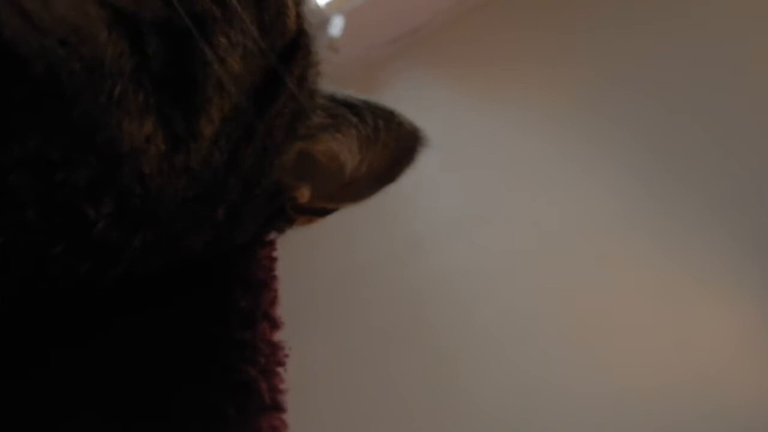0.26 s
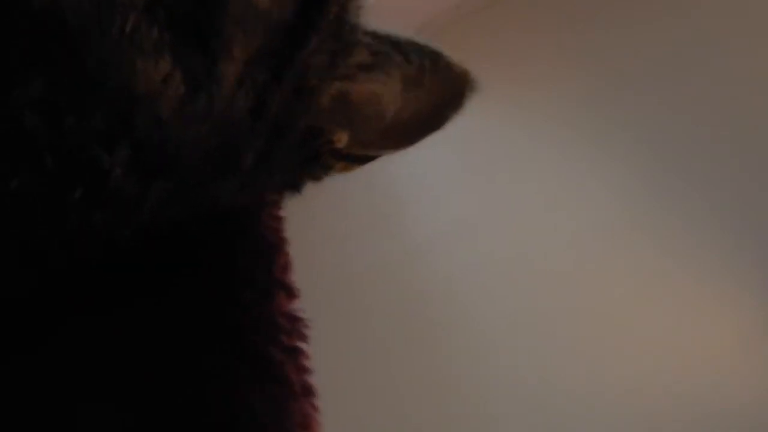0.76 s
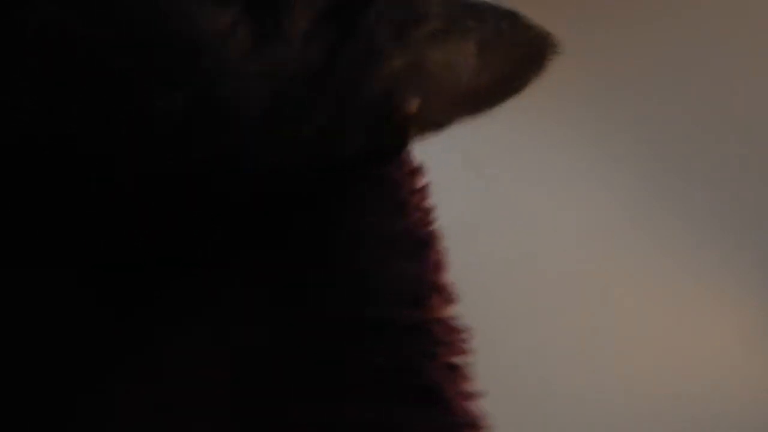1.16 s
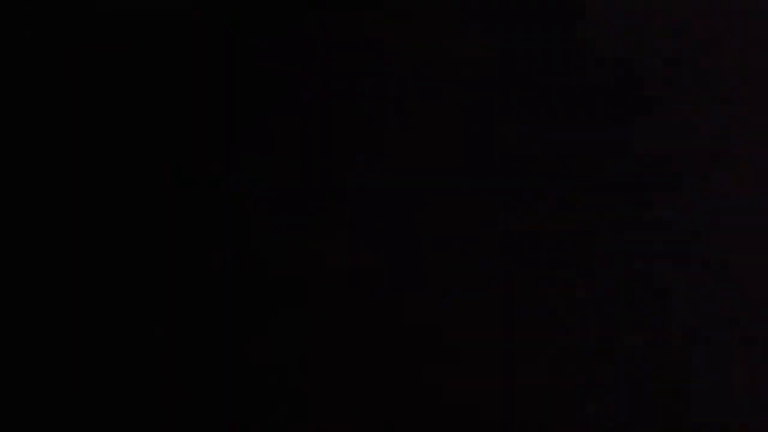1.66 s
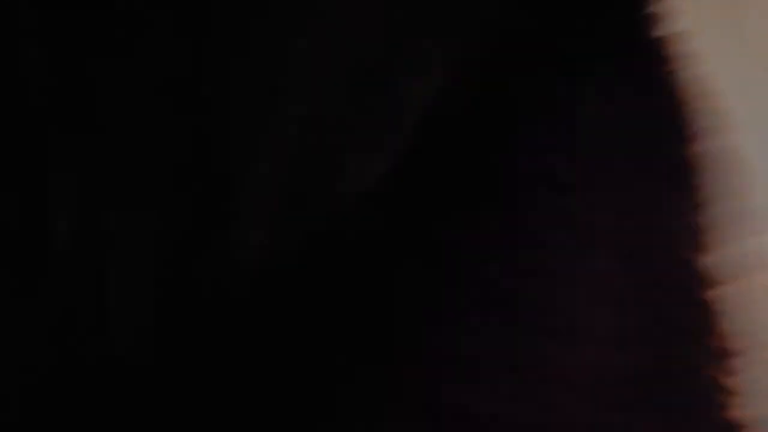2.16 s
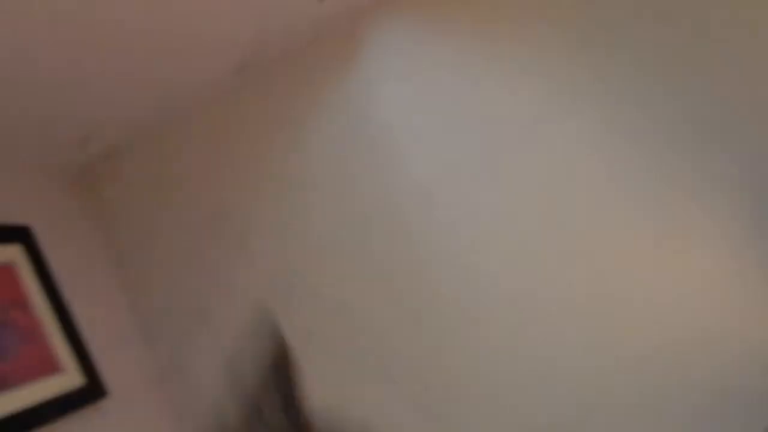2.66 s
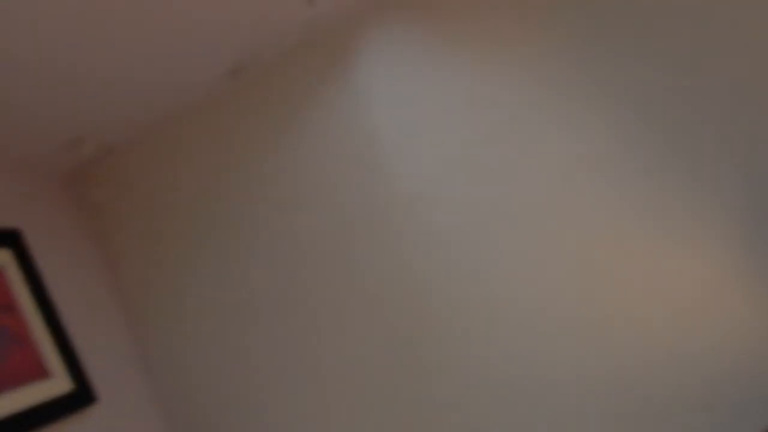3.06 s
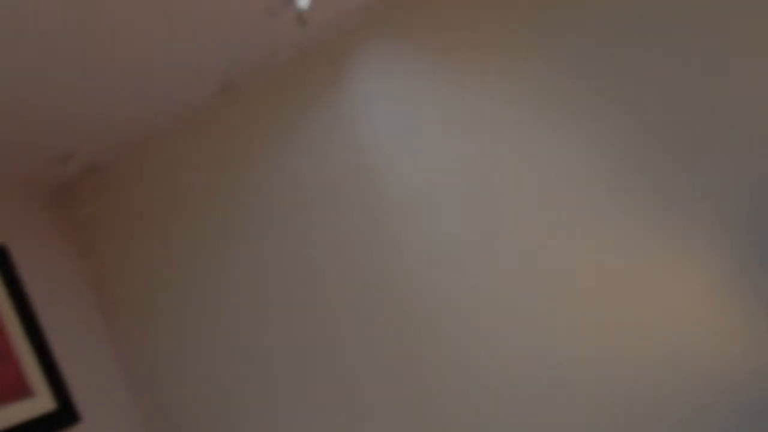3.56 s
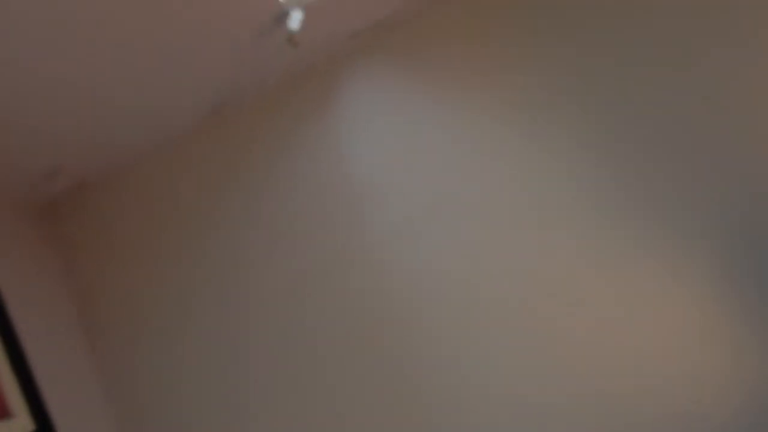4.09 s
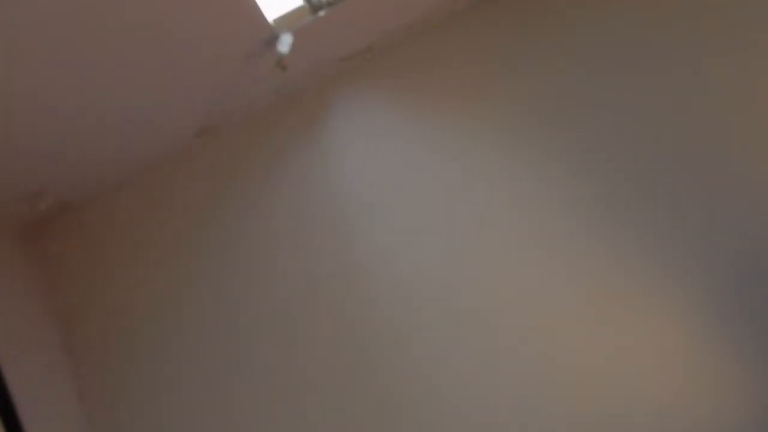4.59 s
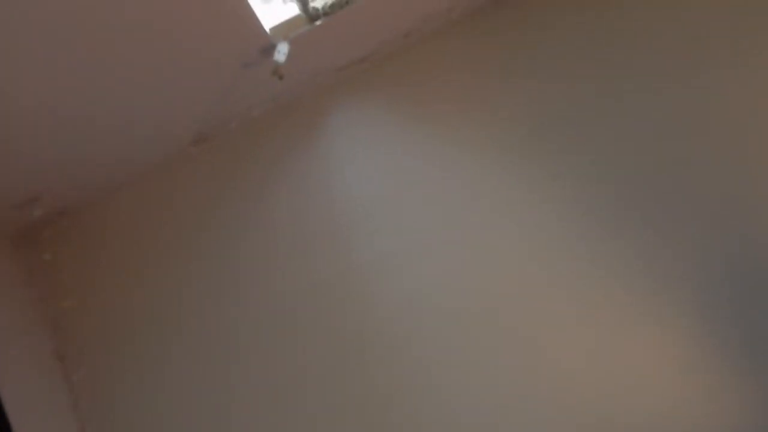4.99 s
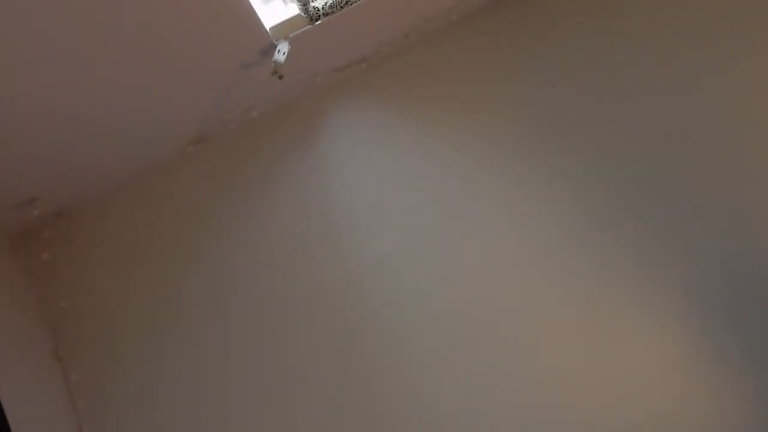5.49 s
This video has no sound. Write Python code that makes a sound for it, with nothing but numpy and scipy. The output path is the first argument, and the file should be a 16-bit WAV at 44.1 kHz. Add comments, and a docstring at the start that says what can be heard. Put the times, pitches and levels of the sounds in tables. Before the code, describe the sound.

Close stereo capture of an upset cat indoors over a very faint steady noise floor. A throaty, shut-mouth growl comes first, then thuds of a body moving on a soft blanket, teeth hiss, sharp spits and a loud breathy snarl. A quiet gap holds little ticks and sniffs. The cat, now further away with more room reflection, rasps, yowls piercingly downward and growls again.

```python
"""A long low growl comes first, from an angry cat right at the microphone in a small room with a faint noise floor.
Soft bumps, a hiss, spits, a hissing snarl and a mutter follow; further off, a rasp opens into a falling yowl,
which sinks back into a growl. Vocal pulses through mouth spectra make the growls, snarl and rasp; summed partials
make the yowl; shaped noise makes the breath, bumps and floor, with ringing sines in the spits.
A slower second vibration in the larynx pulls the pulses early and late, which makes the growls roll."""
import sys
import numpy as np
from scipy import signal
from scipy.fft import rfft, irfft, next_fast_len
from scipy.io import wavfile
from scipy.ndimage import uniform_filter1d

SR = 44100
rng = np.random.default_rng(int(sys.argv[2]) if len(sys.argv) > 2 else 0)


def dump(signal):
    """Clip the signal to [-1, 1] and save it as 16-bit WAV at the path in sys.argv[1]."""
    limited = np.clip(np.atleast_2d(signal).T, -1, 1)
    pcm = np.round(limited * 32767).astype(np.int16)
    wavfile.write(sys.argv[1], SR, pcm)


N = 253134
TIME = np.arange(N) / SR


def amp(db):
    """Decibels to gain."""
    return 10 ** (np.asarray(db) / 20)


def unit(x):
    """Scale to rms 1."""
    return x / np.sqrt(np.mean(x ** 2) + 1e-18)


def even(x):
    """Hold the slow level of a source at rms 1, averaged over 54 ms."""
    return x / np.sqrt(np.abs(uniform_filter1d(x ** 2, size=2400)) + 1e-12)


def curves(table):
    """The columns of a table after its time column, joined by straight lines in time."""
    s, *columns = np.transpose(table)
    return [np.interp(TIME, s, c) for c in columns]


def during(table):
    """Open while the table lasts, with 12 ms edges."""
    inside = np.minimum(TIME - table[0][0], table[-1][0] - TIME)
    return np.clip(inside / .012 + .5, 0, 1)


def note(start, stop, attack_s, release_s):
    """Envelope that rises, holds and falls."""
    return np.clip((TIME - start) / attack_s, 0, 1) * np.clip((stop - TIME) / release_s, 0, 1)


def around(s, width_s):
    """A smooth swell from 0 to 1 and back."""
    return np.exp(-((TIME - s) / width_s) ** 2)


def burst(s, t60, attack_s):
    """Envelope of a sudden sound that dies away by 60 dB in t60 seconds."""
    age = TIME - s
    return np.clip(age / attack_s + .5, 0, 1) * np.exp(-np.log(1000) * np.clip(age / t60, 0, 3))


def walk(rate_hz):
    """Smooth chance with a spread near 1: random points at the given rate, joined by lines."""
    return 1.2 * np.interp(TIME * rate_hz, np.arange(8192), rng.standard_normal(8192))


def colour(x, points):
    """Filter by a spectrum of (frequency [Hz], level [dB]) points, falling away below its lowest point."""
    hz, db = np.transpose(points)
    size = next_fast_len(N + 4096)
    freqs = np.fft.rfftfreq(size, 1 / SR)
    gain = amp(np.interp(np.log(freqs + 1), np.log(hz), db))
    gain = gain * np.minimum(freqs / hz[0], 1) ** 2
    return irfft(rfft(x, size) * gain, size)[..., :N]


def air(points, gate=1):
    """Stereo turbulence, chopped by the gate before it is coloured; the treble differs between the ports."""
    mid, side = rng.standard_normal((2, N))
    side = signal.sosfilt(signal.butter(3, 6200, "high", fs=SR, output="sos"), side)
    stereo = mid + side * np.array([[1.15], [-.4]])
    return unit(colour(stereo * gate, points))


def resonance(hz, width_hz):
    """Air ringing in one resonance whose centre may move."""
    phase = 2 * np.pi * np.cumsum(hz + 0 * TIME) / SR
    return walk(width_hz) * np.cos(phase) + walk(width_hz) * np.sin(phase)


def folds(hz, jitter, shimmer_db=2, pull=0, roll=0, swell=0, lead=0):
    """Vocal pulses, pulled in time and size by a slower vibration; also the puff of air after each."""
    cycles = np.cumsum(hz) / SR
    k = np.arange(1, int(cycles[-1]))
    at = np.interp(k, cycles, np.arange(N)).astype(int)
    chance = rng.standard_normal((len(k), 2)).T
    # roll is the rate of the slow vibration relative to the pulse rate; shift is in cycles
    slow = 2 * np.pi * np.cumsum(hz * roll)[at] / SR
    shift = pull * np.sin(slow) + jitter * chance[0]
    place = np.interp(k + shift, cycles, np.arange(N)).clip(0, N - 2)
    size = (1 + swell * np.cos(slow + lead)) * amp(shimmer_db * chance[1])
    # each pulse is shared between two samples, so it can fall between them
    i, part = place.astype(int), place % 1
    pulses = np.bincount(i, size * (1 - part), N) + np.bincount(i + 1, size * part, N)
    puff = signal.lfilter([1], [1, -np.exp(-1 / (.003 * SR))], pulses)  # 3 ms decay
    return pulses, even(puff)


def linger(x, hz, width_hz):
    """All-pass: a throat resonance holds back its band for a few ms, which softens each pulse."""
    r = np.exp(-np.pi * width_hz / SR)
    a = [1, -2 * r * np.cos(2 * np.pi * hz / SR), r ** 2]
    return signal.lfilter(a[::-1], a, x)


# spectrum of the faint noise floor: (frequency [Hz], level [dB])
FLOOR_SPECTRUM = [(60, -11), (250, -7), (1400, -20), (2100, -16), (3000, -23), (15000, -44.5)]


def noise_floor():
    """Steady coloured noise under everything, drifting slightly in level."""
    floor_db = -60
    return air(FLOOR_SPECTRUM) * amp(floor_db + 2 * walk(10))


def room(x, wet_db, t60):
    """A short tail from the bedroom walls, nearly the same at both ports."""
    age = TIME[:SR // 3]
    noise = rng.standard_normal(len(age)) + 0.36 * rng.standard_normal((2, len(age)))
    tail = noise * amp(-60 * age / t60)
    tail /= np.sqrt(np.sum(tail ** 2, axis=1, keepdims=True))
    return x + amp(wet_db) * signal.fftconvolve(x, tail, axes=1)[:, :N]


# soft bumps: (time [s], thud level [dB], tick relative to thud [dB], thud decay t60 [s])
SOFT_BUMPS = [(1.331, -20.5, -20, 0.089), (1.51, -37, -21, 0.082), (1.628, -32, -14, 0.11),
              (1.726, -26.5, -28, 0.089), (3.171, -46.5, -4.5, 0.094), (3.249, -40, -5, 0.067),
              (3.277, -35, -6.5, 0.073), (3.302, -37.5, 0, 0.08), (3.473, -40.5, -4, 0.23),
              (3.651, -37.5, -6.5, 0.19), (4.141, -14.5, -25, 0.031)]
# fur shifting on the blanket: (start [s], length [s], level [dB])
FUR_RUBS = [(1.405, 0.747, -41.5), (4.288, 0.094, -39)]
# spectra of the dull knock and its light tick: (frequency [Hz], level [dB])
THUD_SPECTRUM = [(130, -3.5), (230, 0), (900, -15.5), (5000, -54.5)]
TICK_SPECTRUM = [(2000, -4), (3500, -19.5), (15000, -33.5)]


def bumps():
    """Dull knocks with a light tick, and the rub of fur on the blanket, all from enveloped noise."""
    thuds = sum(amp(db) * burst(s, t60, attack_s=0.0023) for s, db, _, t60 in SOFT_BUMPS)
    ticks = sum(amp(db + tick_db) * burst(s, 0.058, attack_s=0.0021) for s, db, tick_db, _ in SOFT_BUMPS)
    rubs = sum(amp(db) * note(s, s + length, attack_s=0.0067, release_s=0.031)
               for s, length, db in FUR_RUBS)
    push = thuds + rubs * amp(2 * walk(50))
    # air() levels its output, so the strength of the push is put back
    dull = air(THUD_SPECTRUM, push) * np.sqrt(np.mean(push ** 2))
    return dull + ticks * air(TICK_SPECTRUM)


# the cat sniffs between its calls: (time [s], width [s], level [dB])
SNIFF_TIMES = [(3.098, 0.0098, -61), (3.43, 0.017, -59)]
# spectrum of thin air, also heard over the teeth in the yowl: (frequency [Hz], level [dB])
THIN_AIR_SPECTRUM = [(4600, -14.5), (5300, 9), (6600, -4.5), (9000, -28.5)]


def sniffs():
    """Faint, quick draughts of air that ring the cat's nose."""
    draught = air(THIN_AIR_SPECTRUM) + resonance(2100, width_hz=520)
    return draught * sum(amp(db) * around(s, width) for s, width, db in SNIFF_TIMES)


# spits: (time [s], level [dB], mouth resonance [Hz], decay t60 [s])
SPIT_TIMES = [(2.005, -13.5, 1560, 0.015), (2.0107, -16.5, 1630, 0.016), (2.0158, -18, 1840, 0.04),
              (2.030, -17, 2050, 0.022), (2.073, -22, 2200, 0.043), (2.16, -25, 950, 0.0079),
              (2.588, -17.5, 3403, 0.055)]
# spectrum of air through the teeth, shared with the snarl: (frequency [Hz], level [dB])
HISS_SPECTRUM = [(250, 1.5), (2200, -1), (3400, -4.5), (4000, -8.5), (6000, -11.5), (7100, -9.5),
                 (8000, -16), (15500, -22.5)]
# spectrum of the open mouth, for the spray and the grit of the rasp: (frequency [Hz], level [dB])
OPEN_MOUTH_SPECTRUM = [(1100, -5.5), (1550, 5.5), (2800, -0.5), (3600, -23.5), (4600, -17), (7000, -34.5),
                       (15000, -49)]


def hiss():
    """A soft puff, air pushed between the teeth, then explosive spits that ring the mouth, and a bright spray."""
    full_s, full_db, build_db_per_s = 1.867, -40.5, 58
    flow_db = full_db - build_db_per_s * np.maximum(full_s - TIME, 0)
    flow = amp(flow_db) * note(1.45, 2.288, attack_s=0.026, release_s=0.29)
    puff = amp(-41.5) * burst(1.333, t60=0.45, attack_s=0.02)  # at the end of the growl
    spray = resonance(2270, width_hz=450) + air(OPEN_MOUTH_SPECTRUM)
    spray = spray * amp(-32.5) * around(2.062, width_s=0.036)
    out = air(HISS_SPECTRUM) * (flow + puff) + spray
    for s, db, hz, t60 in SPIT_TIMES:
        splash = air([(hz / 2, -6), (hz, 0), (hz * 1.26, -9), (hz * 4.8, -32)]) * amp(-3)
        # the mouth rings only briefly, however long the splash of air
        ring = np.sin(2 * np.pi * hz * (TIME - s)) * burst(s, min(t60, 0.018), attack_s=0.00011)
        out = out + (ring + splash * burst(s, t60, attack_s=0.00016)) * amp(db)
    return out


# low growl: (time [s], pulse rate [Hz])
GROWL_PITCH = [(0.0, 113.1), (0.36, 107), (0.794, 103.6), (0.92, 109.9), (1.122, 107.3), (1.42, 154.1)]
# spectra of the voice behind shut lips and of the leaking air: (frequency [Hz], level [dB])
CLOSED_MOUTH_SPECTRUM = [(105, -2), (200, 9), (390, 10.5), (490, -3), (820, -14), (1180, -14),
                         (1550, -68.5)]
THROAT_AIR_SPECTRUM = [(1100, 8), (1600, -9.5), (3350, -19), (3650, -11), (4000, -21.5), (5100, -17.5),
                       (5550, -11), (6000, -18.5), (15000, -39)]


def growl():
    """Rolling pulses behind a closed mouth; air leaks after each and flutters, most just before the growl stops."""
    hz, = curves(GROWL_PITCH)
    # louder as effort raises the pitch, then fading as the cat tires
    base_hz, base_db, effort_db_per_octave = 109.3, -25.5, 16.5
    tires_s, fade_db_per_s = 1.234, 102
    effort_db = effort_db_per_octave * np.log2(hz / base_hz)
    db = base_db + effort_db - fade_db_per_s * np.maximum(TIME - tires_s, 0)
    roll = .383 + .012 * walk(25)
    pulses, puff = folds(hz, jitter=.03, shimmer_db=1, pull=.095, roll=roll, swell=.27, lead=1.)
    voice = even(colour(linger(pulses, hz=383, width_hz=203), CLOSED_MOUTH_SPECTRUM))
    leak = air(THROAT_AIR_SPECTRUM, puff) * amp(-23.5)
    flutter = resonance(1150, width_hz=170) * np.sqrt(np.abs(puff)) * amp(-30 + 2 * walk(55))
    throat = (leak + flutter) * amp(4.2 * around(1.33, 0.18))
    return (voice + throat) * amp(db) * during(GROWL_PITCH)


# closing growl: (time [s], pitch [Hz], level [dB])
CLOSING_GROWL = [(4.95, 313.2, -29.5), (5.084, 290.4, -37), (5.128, 241.5, -32.5), (5.49, 201.7, -34),
                 (5.74, 169.3, -33.5)]


def drone():
    """The mouth closes; the slow vibration locks to every fourth, then every third pulse."""
    hz, db = curves(CLOSING_GROWL)
    roll = np.where(TIME < 5.1, 1 / 4, 1 / 3)
    pulses, puff = folds(hz, jitter=.042, pull=.1, roll=roll, swell=.22, lead=.3)
    # a tighter throat lifts the resonance and thins the bass
    throat = colour(pulses, CLOSED_MOUTH_SPECTRUM)
    throat = colour(throat, [(200, -6.5), (380, 1.5), (930, 6), (1250, -2.0)])
    # the fundamental hums through the nose
    hum = np.cos(2 * np.pi * np.cumsum(hz) / SR) * amp(-5.5) * around(5.26, 0.13)
    leak = colour(air(THROAT_AIR_SPECTRUM, puff), [(3500, -13.5), (6000, -37.5)])
    return (even(throat) * amp(0.73) + hum + leak) * amp(db + walk(37)) * during(CLOSING_GROWL)


# spectra of the ragged voice and of the firm overtones: (frequency [Hz], level [dB])
RAGGED_SPECTRUM = [(700, 3.5), (1150, -0.5), (1900, -24)]
OVERTONE_SPECTRUM = [(750, -19), (1050, 10), (2400, 0), (5000, -27)]


def snarl(table, hiss_db, overtone_db, attack_s):
    """A strong wavering fundamental, overtones that come and go, and air forced through the open jaws."""
    hz, voice_db = curves(table)
    hz = hz * (1 + .016 * walk(90))
    pulses, puff = folds(hz, jitter=.055)
    firm, _ = folds(hz, jitter=.022)
    # the airflow swells smoothly once a cycle; the folds snap shut now raggedly, now firmly
    flow = np.sqrt(2) * np.sin(2 * np.pi * np.cumsum(hz) / SR) * amp(walk(160))
    ragged = amp(-4.0) * even(colour(pulses, RAGGED_SPECTRUM))
    overtones = even(colour(firm, OVERTONE_SPECTRUM)) * amp(overtone_db + 2.1 * walk(39.56))
    overtones = overtones * around(2.494, 0.09)
    voice = (flow + ragged + overtones) * amp(voice_db)
    rise = np.clip((TIME - table[0][0]) / attack_s, 0, 1)
    blast = air(HISS_SPECTRUM, puff) * amp(hiss_db) * rise
    return (voice + blast) * during(table)


# hissing snarl, then the mutter it collapses into: (time [s], pitch [Hz], voice level [dB])
SNARL_VOICE = [(2.183, 440.5, -24.5), (2.257, 369.5, -20), (2.287, 389, -17), (2.305, 466.3, -19.5),
               (2.325, 408.8, -18.5), (2.375, 338.4, -21), (2.5, 339.6, -21), (2.545, 406.4, -25.5),
               (2.598, 407.4, -26)]
MUTTER_VOICE = [(2.6, 345.3, -40), (2.762, 228.1, -40), (2.95, 196.3, -42.5), (2.99, 189, -59)]
# harsh resonance of the gaping jaws: (time [s], centre [Hz], level [dB])
GAPING_JAWS = [(2.195, 1100, -29), (2.27, 1526, -22.5), (2.33, 1296, -27.5), (2.41, 1192, -33)]


def outburst():
    """The snarl, with a harsh resonance that follows the jaws, collapses into a mutter with a throaty push."""
    gape_hz, gape_db = curves(GAPING_JAWS)
    _, puff = folds(curves(SNARL_VOICE)[0], jitter=.1)
    scream = resonance(gape_hz, width_hz=570) * puff * amp(gape_db) * during(GAPING_JAWS)
    loud = snarl(SNARL_VOICE, hiss_db=-24.0, overtone_db=-4.5, attack_s=0.059)
    mutter = snarl(MUTTER_VOICE, hiss_db=-41.0, overtone_db=-16, attack_s=0.15)
    # the throaty push comes near the end of the mutter
    rattle, _ = folds(curves(MUTTER_VOICE)[0], jitter=.16)
    push = amp(-36.5) * around(2.895, width_s=0.08) * during(MUTTER_VOICE)
    throat = even(colour(rattle, RAGGED_SPECTRUM)) * push
    return loud + scream + throat + mutter


def grit(hz):
    """Chaotic pulses and their air, heard through the open mouth."""
    rattle, puff = folds(hz, jitter=.25)
    return even(colour(rattle, OPEN_MOUTH_SPECTRUM)) + air(OPEN_MOUTH_SPECTRUM, puff)


# spectra of the rasp in the chest and through the half-open mouth: (frequency [Hz], level [dB])
CHEST_SPECTRUM = [(150, 23), (320, 25.5), (560, 9.5), (850, 16), (1400, -26)]
HALF_OPEN_SPECTRUM = [(700, -0.5), (1100, -5.5), (1400, 7.5), (1850, -3), (2480, -2), (2800, -19),
                      (3900, -34.5), (5000, -21.5), (7500, -65)]


def rasp():
    """A push from the chest, then rough pulses quicken behind half-open jaws and surge as the mouth opens wide."""
    start_s, mouth_opens_s, stop_s = 3.73, 3.765, 4.26
    start_hz, rise_hz_per_s = 103.64, 770
    chest_db, mouth_db, mouth_rise_db_per_s = -40.5, -45, 28
    age = np.clip(TIME, start_s, stop_s) - start_s
    hz = (start_hz + rise_hz_per_s * age) * (1 + .05 * walk(35))
    pulses, _ = folds(hz, jitter=.11)
    chest = even(colour(pulses, CHEST_SPECTRUM)) * amp(chest_db + 6.0 * around(3.79, 0.06))
    chest = chest * note(start_s, stop_s, attack_s=0.029, release_s=0.063)
    mouth_level = amp(mouth_db + mouth_rise_db_per_s * age + 2 * walk(60))
    mouth = even(colour(pulses, HALF_OPEN_SPECTRUM)) * mouth_level
    mouth = mouth * note(mouth_opens_s, stop_s, attack_s=0.034, release_s=0.13)
    surge = grit(hz) * amp(-28) * around(4.19, width_s=0.051)
    return chest + mouth + surge


# yowl: (time [s], pitch [Hz], level [dB])
YOWL_VOICE = [(4.21, 530, -46), (4.28, 509, -29), (4.308, 590, -28.5), (4.335, 599, -20), (4.375, 585, -28),
              (4.415, 601.8, -26.5), (4.435, 552.4, -27), (4.495, 522.5, -38.5), (4.516, 483.8, -31),
              (4.686, 438.8, -36.5), (4.83, 371.6, -33), (4.95, 320.4, -45)]
# moving mouth resonances: (time [s], lower [Hz], upper [Hz], upper relative to lower [dB])
YOWL_MOUTH = [(4.28, 1050, 1600, 19.5), (4.315, 1170, 2360, -6.5), (4.38, 1210, 2250, 8),
              (4.43, 1100, 1720, 8), (4.555, 950, 1370, 6), (4.62, 920, 1270, -2.5), (4.9, 690, 986, -21)]
# piercing overtones of the open mouth: (frequency [Hz], level [dB])
PIERCING_RING = [(1800, -30.5), (4150, -24), (5400, -30.5), (6500, -47)]


def yowl():
    """A piercing cry; as the jaw closes resonances sink, the voice breaks up briefly and half tones swell."""
    hz, db = curves(YOWL_VOICE)
    lower_hz, upper_hz, upper_db = curves(YOWL_MOUTH)
    # the jaw counts as shut or wide open at these upper resonances
    shut_hz, wide_hz = 1047, 2490
    jaw = np.clip((upper_hz - shut_hz) / (wide_hz - shut_hz), 0, 1)
    rough = .7 + .45 * around(4.47, .06) - .35 * around(4.35, .06)
    waver = rough * (.01 * walk(60) + .02 * walk(500))
    phase = 2 * np.pi * np.cumsum(hz * (1 + waver)) / SR
    # (centre [Hz], width [Hz], peak gain); with the jaw shut, the voice leaves by the nose
    mouth = [(lower_hz, 486, 1), (upper_hz, 390, amp(upper_db)), (385, 46, amp(9.5) * (1 - jaw))]
    ring_hz, ring_db = np.transpose(PIERCING_RING)
    split = .08 + .36 * around(4.6, .08)  # strength of the half tones
    cry, power = 0, 0
    for k in np.arange(1, 12, .5):
        ring = jaw * amp(np.interp(k * hz, ring_hz, ring_db))
        gain = ring + sum(peak / (1 + ((k * hz - centre) / width) ** 2) ** 2
                          for centre, width, peak in mouth)
        partial = gain * amp(4 * rough * walk(35)) * (split if k % 1 else 1)
        flicker = amp(3.5 * rough * walk(170))
        cry = cry + partial * flicker * np.sin(k * phase + .2 * k * rough * walk(120))
        power = power + partial ** 2
    voice = np.sqrt(2 / power) * cry * amp(db)
    # the grit of the rasp lingers while the jaw is open, with a thin hiss over the teeth
    breath = grit(hz) * amp(-35.5) * jaw * rough
    teeth = air(THIN_AIR_SPECTRUM) * amp(-58.5) * around(4.6, 0.084)
    return (voice + breath + teeth) * during(YOWL_VOICE)


def scene():
    """The cat starts right at the microphone and yowls from further off, where the walls answer."""
    near = room(growl() + hiss() + outburst() + sniffs() + bumps(), wet_db=-11, t60=0.2)
    far = room(rasp() + yowl() + drone(), wet_db=-4, t60=0.37)
    return noise_floor() + near + far


def record(dry):
    """The left microphone port is weaker towards the treble; loud peaks are rounded and the top is cut steeply."""
    top_hz = 15900
    left = colour(dry[0], [(20, 0.3), (3000, -2.0)])
    rounded = .7 * np.tanh(np.array([left, dry[1]]) / .7)
    return signal.sosfilt(signal.ellip(10, .2, 80, top_hz, fs=SR, output="sos"), rounded)


dry = scene()
out = record(dry)
dump(out)
```